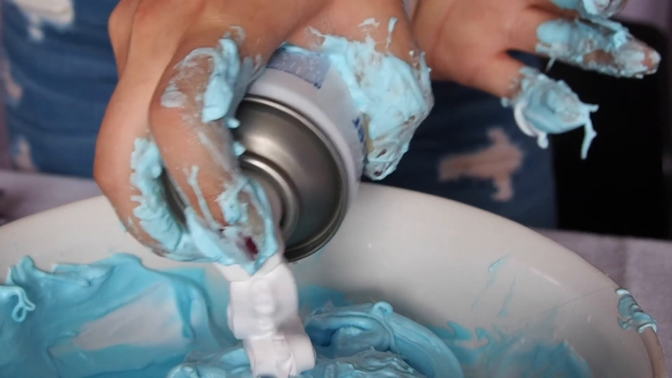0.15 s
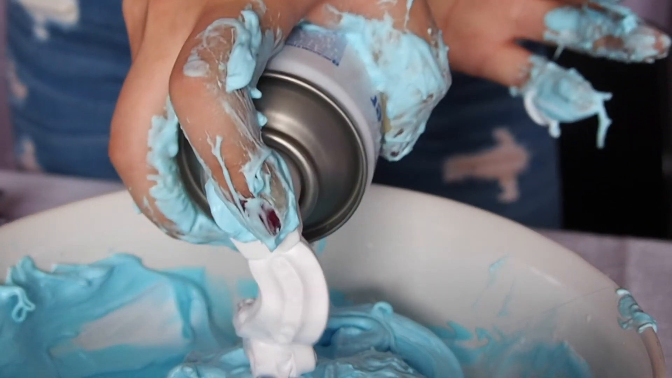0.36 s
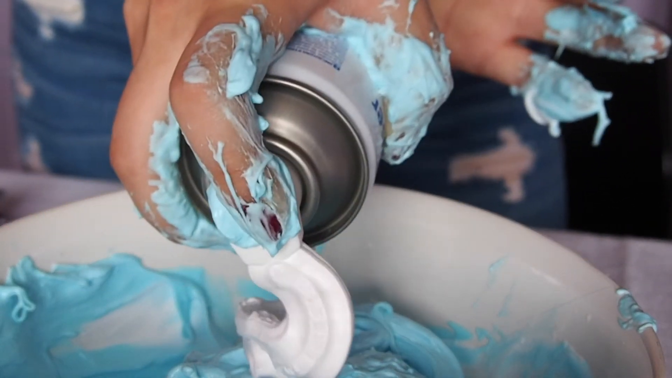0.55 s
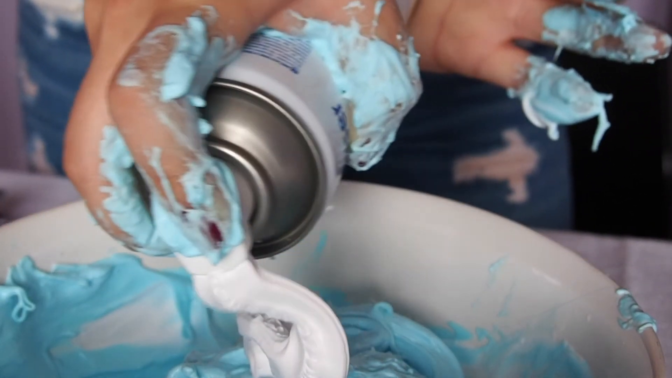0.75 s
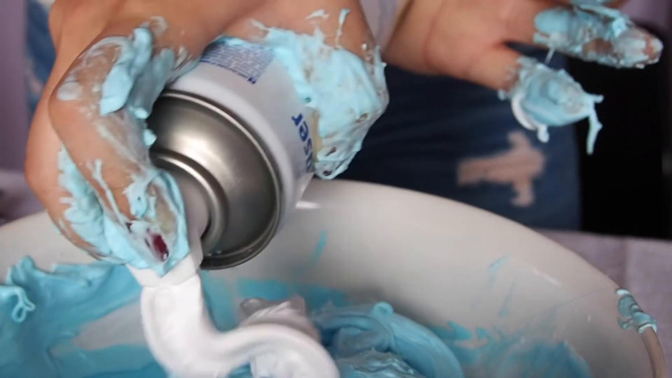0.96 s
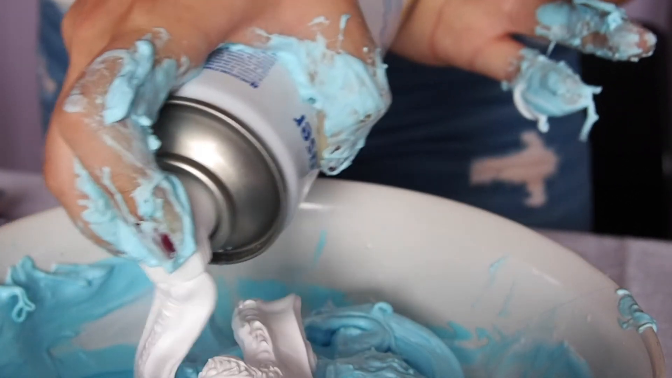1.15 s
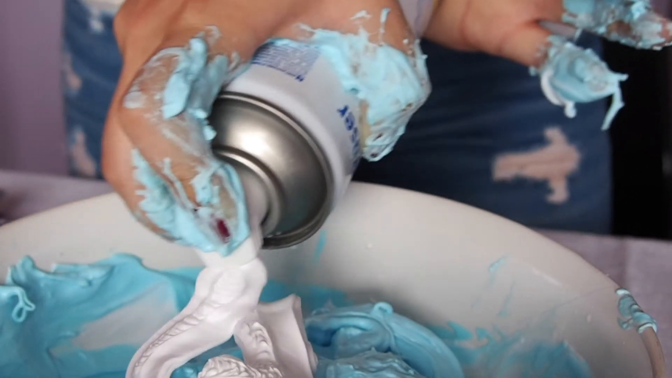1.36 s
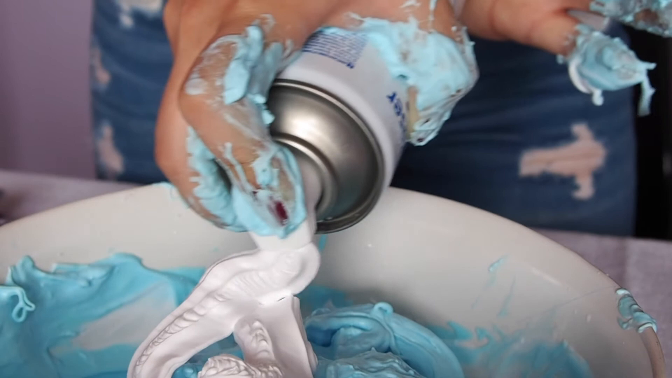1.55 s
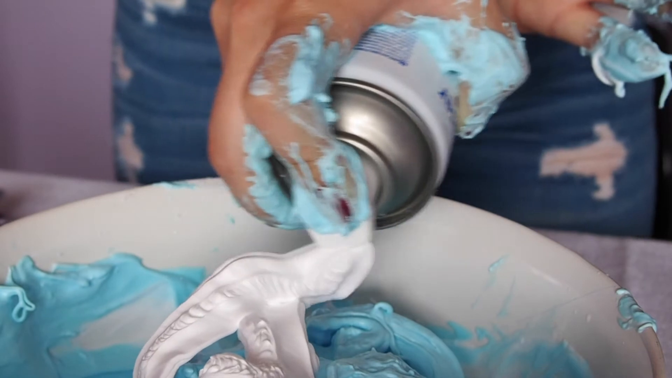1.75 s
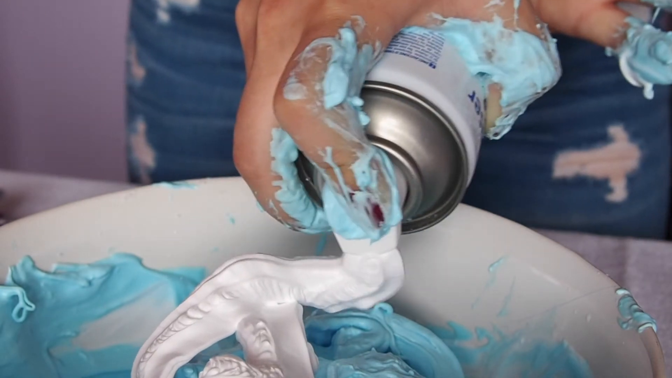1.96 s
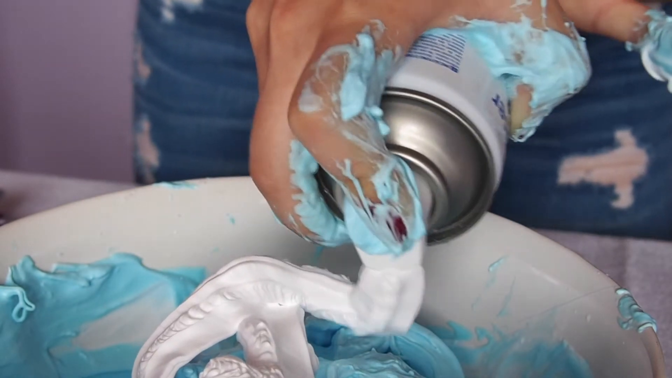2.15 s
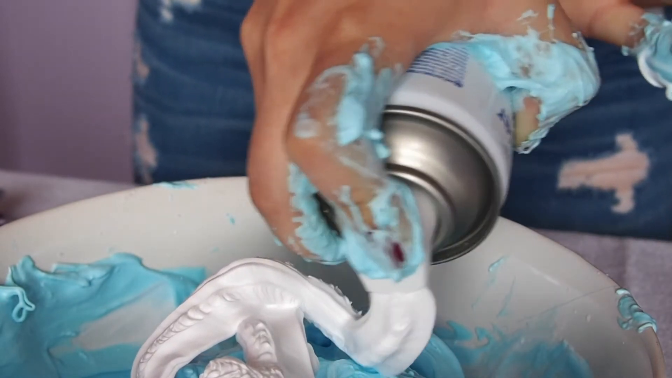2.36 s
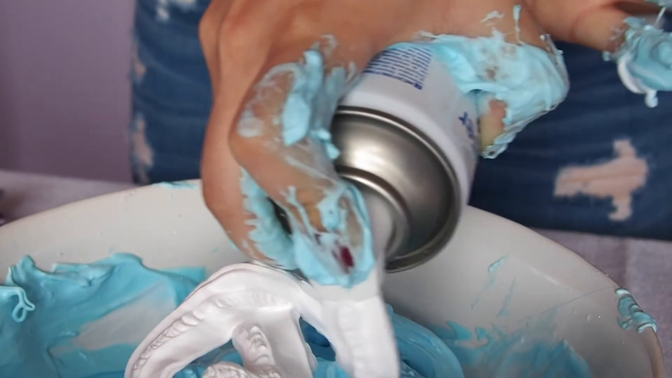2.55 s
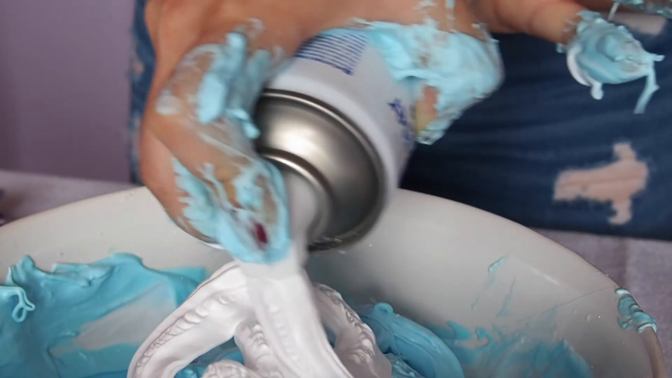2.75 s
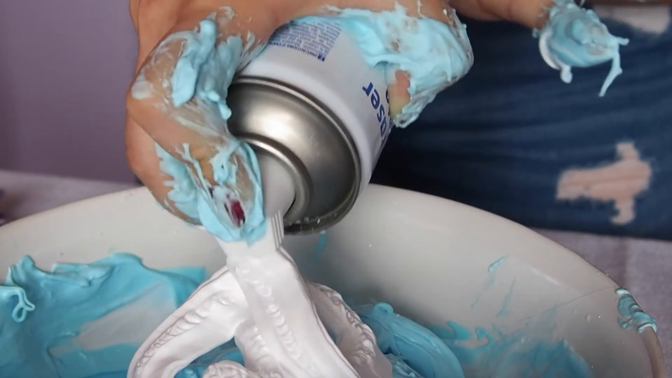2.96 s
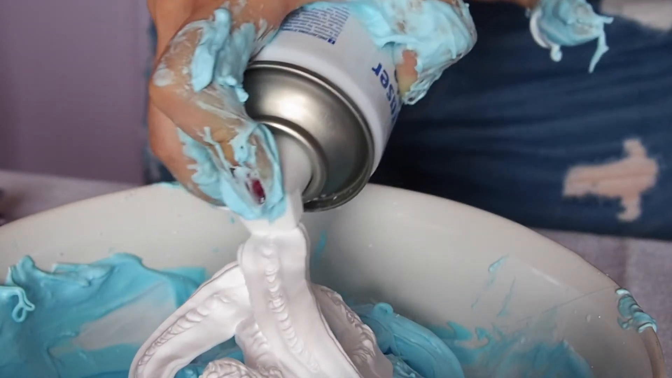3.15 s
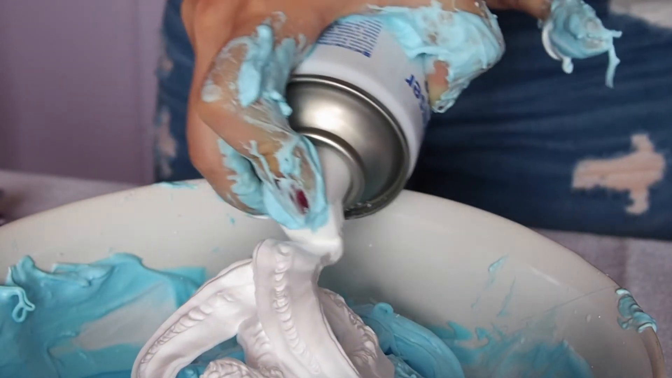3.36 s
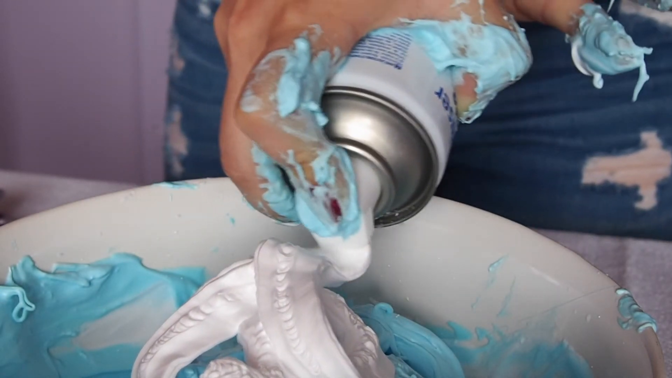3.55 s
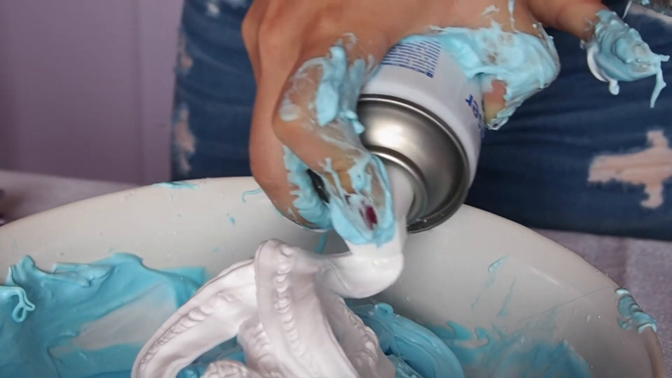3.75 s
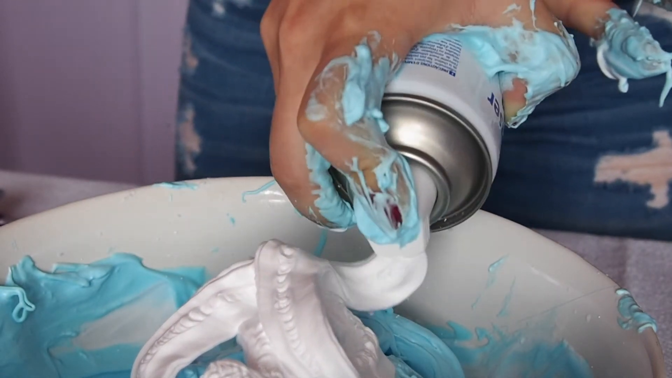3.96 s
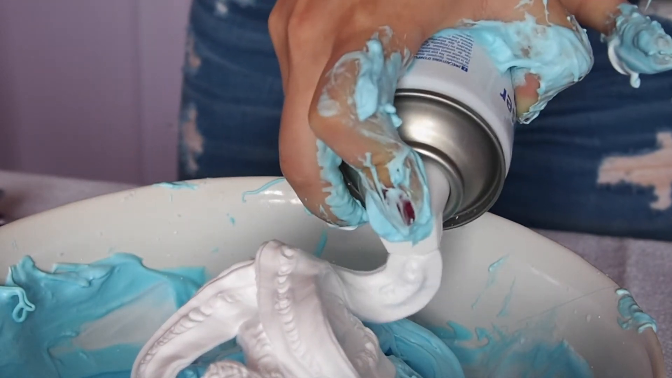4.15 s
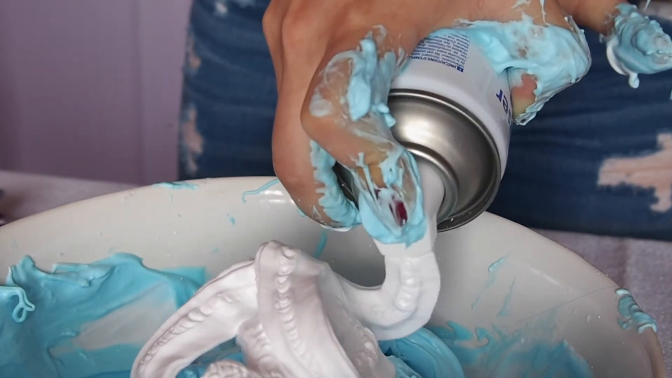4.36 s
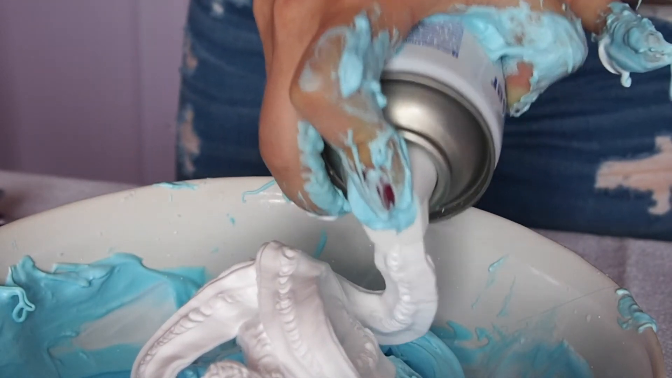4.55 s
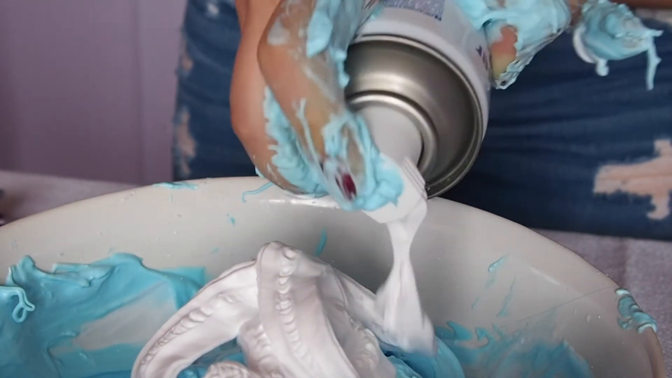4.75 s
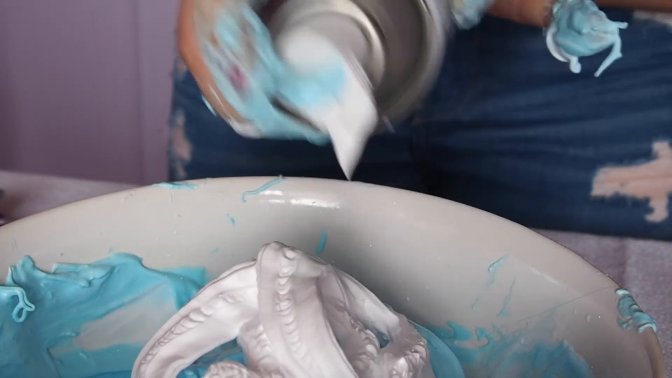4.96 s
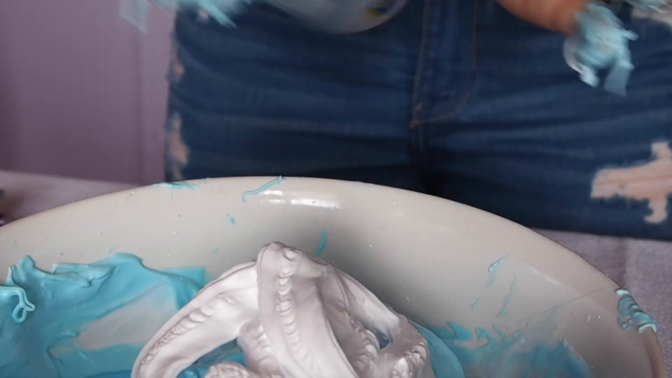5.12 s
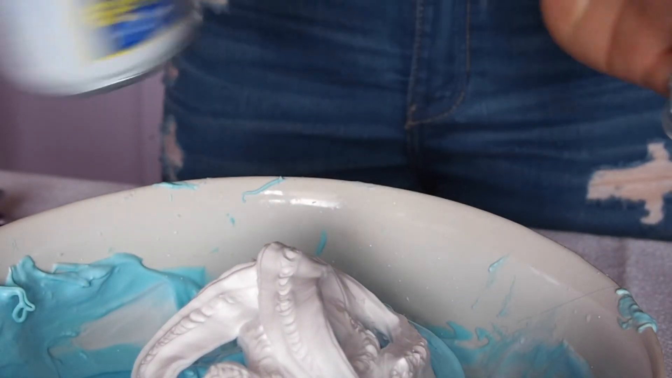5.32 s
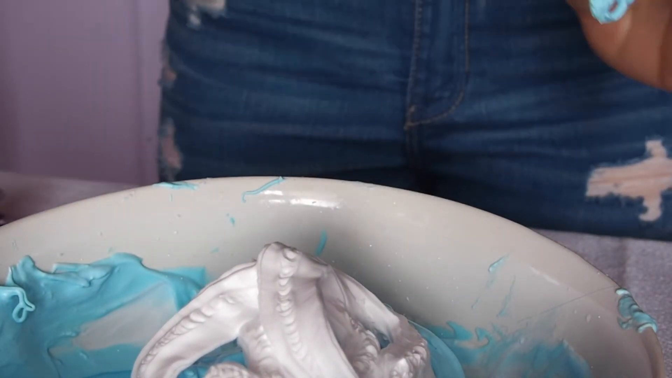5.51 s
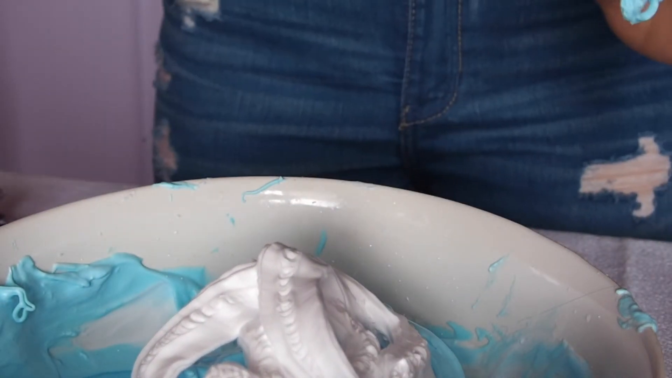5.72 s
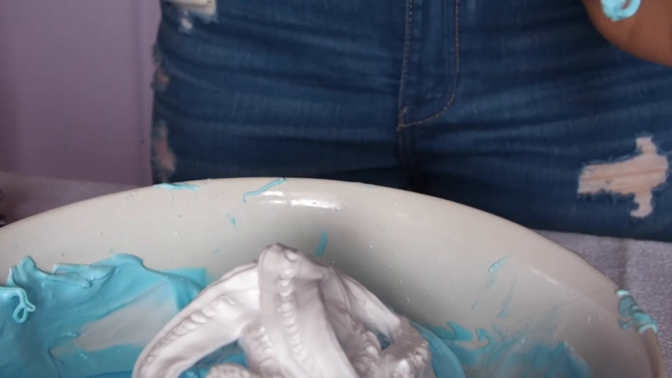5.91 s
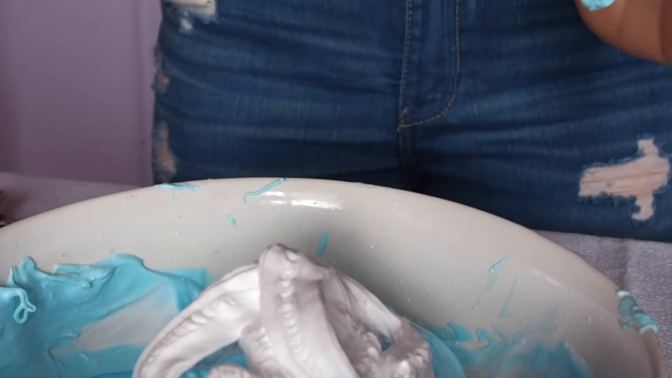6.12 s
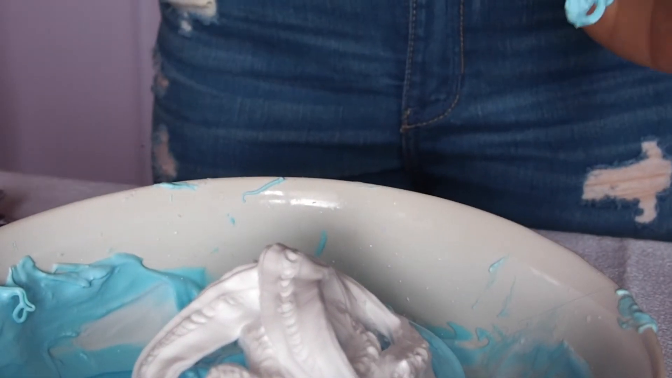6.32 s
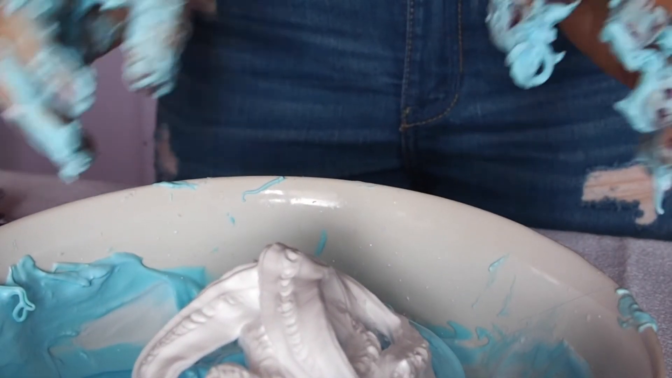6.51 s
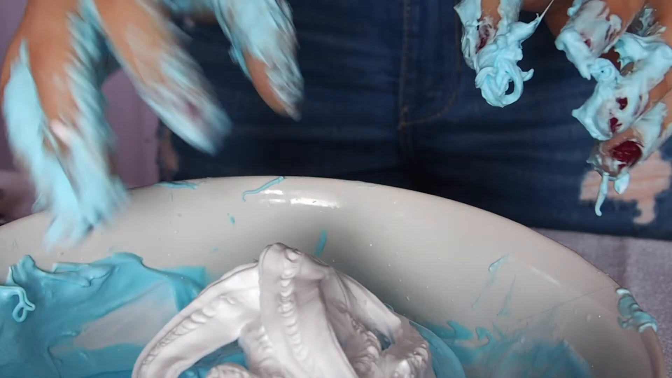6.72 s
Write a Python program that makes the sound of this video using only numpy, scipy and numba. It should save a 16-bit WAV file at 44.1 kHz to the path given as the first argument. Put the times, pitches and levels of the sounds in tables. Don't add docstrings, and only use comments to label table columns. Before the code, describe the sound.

Very close to a stereo microphone in a small quiet room, a pressurised can sprays foam into a bowl. A smooth loud hiss soon turns into fast, uneven sputtering with a shifting hollow ring. The valve shuts suddenly; a few sticky ticks and faint rubbing follow, then the can lands on a table with a low thud and a quick rattle.

```python
import sys
import numpy as np
from scipy import signal
from scipy.fft import rfft, irfft
from scipy.io import wavfile
from scipy.ndimage import uniform_filter1d, map_coordinates
from numba import njit

SR = 44100
rng = np.random.default_rng(int(sys.argv[2]) if len(sys.argv) > 2 else 0)


def gain_from_decibels(decibels):
    exponent = np.asarray(decibels, float) / 20
    return 10 ** exponent


def wav_out(sig):
    wavfile.write(sys.argv[1], SR, np.round(np.clip(np.atleast_2d(sig).T, -1, 1) * 32767).astype(np.int16))


N = 298998
TIME_S = np.arange(N) / SR
VALVE_SHUT_S = 4.697

# pitch_hz, level_db (per Hz)
JET_COLOUR = [(24, -72), (40, -38.5), (230, -12.5), (410, -19), (520, -5.5), (750, -1), (1440, -10.5),
              (1900, -5), (3300, -4.5), (4200, -4.5), (6200, -6), (9500, -7), (12800, -11.5),
              (16000, -16.5)]
# pitch_hz, likeness (-1 to 1)
JET_LIKENESS = [(30, .7), (90, 0.91), (200, 1), (1300, 0.91), (4400, 0.87), (8000, 0.57), (15000, 0.38)]
# start_s, steady_gas_db, pocket_strength_db, pockets_per_s
VALVE_FLOW = [
    (0, -13.5, -32, 43),
    (.6, -12.5, -3.5, 41),
    (1.2, -12, -4, 47),
    (1.7, -14, -1.5, 60.7),
    (2.3, -16, 0, 52.5),
    (2.9, -14.5, 4.5, 52),
    (3.2, -16, 1, 40),
    (3.9, -15.5, 2, 41.5),
    (4.66, -14, 1.5, 55),
]


def spray():
    gas_db, strength_db, per_s = in_time(VALVE_FLOW)
    plain = stereo_noise(JET_COLOUR, JET_LIKENESS)
    jet = hollows(plain)
    swing_ms = np.interp(TIME_S, [0, VALVE_SHUT_S], [-0.014, 0.014]) + 0.0042 * drift(0.83)
    jet = delayed(jet, swing_ms * np.array([[1], [-1]]), order=3)
    bass, body, middle, treble = split(jet, [350, 1100, 6600])
    treble = gain_from_decibels([[-1.0], [0.7]]) * treble
    middle, treble = near_echoes(middle, treble)

    open_valve = np.clip((VALVE_SHUT_S - TIME_S) / 0.011, 0, 1)
    pops = small_pops(per_s=71.0, length_ms=0.71, spread_db=6.0)
    steady = gain_from_decibels(gas_db - 6.5) * np.hypot(gain_from_decibels(0.5), gain_from_decibels(-3.5) * pops)
    flow = np.hypot(steady, spurt_gain(pockets(strength_db, per_s))) * open_valve

    turned = np.clip((TIME_S - 2.6) / 0.4, 0, 1)
    body_db = 0.5 - 0.4 * turned + 1.0 * drift(22)
    treble_db = 2.5 - 2 * turned + 3.5 * drift(150)
    hiss = body * gain_from_decibels(body_db) + middle * gain_from_decibels(1.64 * drift(165)) + treble * gain_from_decibels(treble_db)
    tearing_db = 1.4 * drift(300)
    hiss = filtered(hiss * flow * gain_from_decibels(tearing_db), 2, 250, "high")
    near = hiss * left_right(-0.3) + bass * gain_from_decibels(gas_db + 2.5) * open_valve
    far = gain_from_decibels(2.5) * filtered(plain, 1, 900, "high") * uniform_filter1d(flow, size=600)
    return near, far


def near_echoes(middle, treble):
    for lag_ms, echo_db in [(0.7, 0), (1.3, -3.5), (2.5, -40)]:
        path_ms = lag_ms + 0.094 * np.array([drift(0.66), drift(0.79)])
        middle = middle + gain_from_decibels(echo_db - 10.5) * delayed(middle, path_ms, order=1)
        treble = treble + gain_from_decibels(echo_db - 6) * delayed(treble, path_ms, order=1)
    return middle, treble


# start_s, peak_db
BIG_BURSTS = [(0.027, 6.5), (0.932, 3), (1.358, 0), (1.5634, 7), (1.74, 5), (1.8132, 4.5), (1.8751, 4),
              (1.9607, 6.5), (2.0993, 2.5), (2.209, 7), (2.4264, 8), (2.5107, 6), (2.608, 5), (2.687, 8),
              (2.7834, 3), (2.9079, 0), (3.047, -7), (3.1607, 5), (3.221, 5), (3.424, 3.5), (3.5112, 3.5),
              (3.8284, 5), (3.8851, 5), (3.9825, 3), (4.0452, 6.5), (4.133, -2), (4.337, 3.5), (4.3916, 4),
              (4.5536, 3.5), (4.6179, 5.5)]


def pockets(strength_db, per_s):
    gap, size, length = rng.standard_normal((300, 3)).T
    gap_spread = 0.33
    uneven_gaps = np.exp(gap_spread * gap - gap_spread ** 2 / 2)
    start_s = np.interp(np.cumsum(uneven_gaps), np.cumsum(per_s) / SR, TIME_S)
    burst_s, burst_db = np.transpose(BIG_BURSTS)
    clear_of_bursts = np.abs(start_s[:, None] - burst_s).min(axis=1) > 0.012
    free = clear_of_bursts & (start_s < VALVE_SHUT_S)
    peak_db = strength_db[(start_s * SR).astype(int)] + 1.2 * size

    start_s = np.r_[burst_s, start_s[free]]
    peak_db = np.r_[burst_db + 0.3, peak_db[free]]
    stretch = np.r_[np.full(len(burst_s), 0.85), np.exp(0.19 * length[free])]
    stretch = stretch * np.where(start_s > 3.0, 1.39, 1)
    length_ms = 1000 * 0.22 / per_s[(start_s * SR).astype(int)] * stretch
    return zip(start_s, peak_db, length_ms)


def spurt_gain(rows):
    out = np.zeros(N)
    for start_s, peak_db, length_ms in rows:
        t = np.arange(int(0.05 * SR)) / SR / (max(length_ms, 1) / 1000)
        shape = (1 - np.exp(-t / 0.46)) * np.exp(-t ** 2 * 0.86)
        start = max(int((start_s - 0.001) * SR), 0)
        span = slice(start, start + len(t))
        out[span] = np.hypot(out[span], gain_from_decibels(peak_db - 11.0) * shape)
    return out


def small_pops(per_s, length_ms, spread_db):
    born = (rng.random(N) < per_s / SR) * gain_from_decibels(spread_db * np.minimum(rng.exponential(1, N), 2))
    r = np.exp(-1000 / (length_ms * SR))
    return rms_one(np.sqrt(signal.lfilter([1], [1, -2 * r, r * r], born ** 2 + 1e-12)))


# start_s, pitch_hz, ring_db
NOZZLE_GAP = [(0, 4100, 12), (.45, 3950, 12), (.95, 3790, 7), (1.2, 4000, 9), (1.45, 4600, 6),
              (1.75, 4887, 9), (2.0, 4500, 8), (2.15, 4320, 13.5), (2.35, 4070, 10), (2.6, 3748, 7),
              (2.9, 3806, 13), (3.1, 4500, 9.5), (3.45, 4920, 9), (3.7, 5720, 6.5), (3.85, 6080, 10.5),
              (4.2, 5800, 6.5), (4.66, 6050, 5)]
# from_s, to_s, from_hz, to_hz, lift_db (negative cancels)
NOOKS = [(-.2, 0.79, 2320, 2110, 7), (-.2, 1.072, 5100, 4170, -22), (.7, 1.05, 8600, 8800, 4),
         (0.793, 1.315, 2630, 2880, 4), (1.007, 1.302, 7050, 7830, 12.5), (1.193, 2.01, 2420, 1960, 7),
         (1.398, 1.8, 8600, 8300, 2.5), (1.76, 2.14, 9500, 8800, 9), (1.897, 2.81, 2900, 2980, 8),
         (2.29, 2.574, 9100, 8600, 9.5), (2.5, 3.15, 1150, 1210, -18), (2.498, 3.456, 2040, 1930, 7.5),
         (3.048, 4.637, 1620, 1550, -34), (3.1, 3.81, 2820, 2840, 5.5), (3.085, 3.743, 8300, 9800, 2.5),
         (3.212, 4.643, 1210, 1320, 6.5), (3.6, 4.668, 3850, 3556, 8), (4.482, 4.904, 4188, 4394, 11),
         (-.2, 1.192, 1200, 1060, -8)]


def hollows(jet):
    gap_hz, ring_db = in_time(NOZZLE_GAP)
    jet = lift(jet, gap_hz, 590, ring_db)
    jet = lift(jet, 0.869 * gap_hz, 390, -7)
    for from_s, to_s, from_hz, to_hz, lift_db in NOOKS:
        span = np.arange(max(int(from_s * SR), 0), int(to_s * SR))
        t = span / SR
        opened = np.clip(np.minimum(t - from_s, to_s - t) / 0.13, 0, 1)
        hz = np.interp(t, [from_s, to_s], [from_hz, to_hz])
        width_hz = 220 + 0.0083 * from_hz
        jet[:, span] = lift(jet[:, span], hz, width_hz, lift_db * opened)
    return jet


# start_s, blow_db, rim_db
BLOWS = [
    (5.7909, 2.5, -29),
    (5.8262, -7.5, -20),
    (5.845, -6.5, -21.5),
    (5.862, -6.5, -28),
    (5.878, -15, -16),
    (5.915, -10.5, -20.5),
    (5.950, -25, -18.5),
    (5.99, -12, -29),
    (6.044, -32, -38),
]
# pitch_hz, level_db, fade_s (by 60 dB)
TABLE_BOOM = [(89, -37, 0.93), (167.4, -7.5, 0.67), (215, -8, 0.4), (200, -2.5, 0.091)]
# pitch_hz, level_db, fade_s (by 60 dB)
TABLE_TOP = [(147, -34, 0.18), (230.4, -12, 0.16), (259, -6, 0.098), (380, -26, 1), (454, -13, 0.15),
             (529, -0.5, 0.14), (637, 3.5, 0.18)]
# pitch_hz, level_db, fade_s (by 60 dB)
CAN_BODY = [(591, 1, 0.18), (692, -1, 0.066), (900, 3.5, 0.17), (1016, -11, 0.12), (1350, -15, 0.094),
            (1767, -6.5, 0.056), (1980, -22, 0.14)]
# pitch_hz, level_db, fade_s (by 60 dB)
BASE_EDGE = [(2820, -36.5, 0.0035), (3850, -38.5, .002), (4860, -38, 0.0043), (6900, -46, 0.0035),
             (8900, -55, .003)]


def set_down():
    start_s, blow_db, rim_db = np.transpose(BLOWS)
    blows, rim, edge, heel = np.zeros((4, N))
    blows[(start_s * SR).astype(int)] = gain_from_decibels(blow_db)
    rim[(start_s * SR).astype(int)] = gain_from_decibels(rim_db)
    edge[int(5.8015 * SR):][:130] = rng.standard_normal(130)

    push = filtered(blows, 4, 330)
    first_push = push * (TIME_S < start_s[1])
    table = ring_all(first_push, TABLE_BOOM) + ring_all(push, TABLE_TOP)

    chatter = 0.075 * signal.lfilter([1], [1, -gain_from_decibels(-60 / (0.082 * SR))], rim) * rng.standard_normal(N)
    knock = gain_from_decibels(9) * filtered(chatter, 2, [350, 1700], "band")
    struck = filtered(0.55 * rim + 0.15 * chatter, 4, 2100)
    heel[((5.829 + 0.036 * np.arange(4)) * SR).astype(int)] = gain_from_decibels(-24)
    heel = signal.lfilter([0.1], [1, -gain_from_decibels(-60 / (0.066 * SR))], heel) * rng.standard_normal(N)
    low_modes = [mode for mode in CAN_BODY if mode[0] < 1500]
    high_modes = [mode for mode in CAN_BODY if mode[0] >= 1500]
    can = knock + ring_all(struck, low_modes) + ring_all(heel, high_modes) + ring_all(edge, BASE_EDGE)

    damped = gain_from_decibels(-150 * np.maximum(TIME_S - 5.965, 0))
    return filtered((table + can) * damped, 4, 72, "high")


# start_s, peak_db, pitch_hz, left_right_db, bright_snap_db
TICKS = [(4.837, -25, 5200, -8, 9), (5.118, -15, 6000, 1.0, -1.5), (5.258, -24, 5800, -3, -9),
         (5.344, -1.5, 5070, 5, -4.5), (5.5197, -23.5, 4770, -4, -2), (5.8981, -35, 11700, 5, 2),
         (6.0085, -20, 7920, 4, -15), (6.1471, -29, 12200, -8, -6), (6.176, -32, 12600, 6.5, -13),
         (6.187, -26, 8000, 4, 7), (6.2064, -35, 12600, -6, -10), (6.5506, -23, 4700, -1.0, -11)]


def ticks():
    out = np.zeros((2, N))
    t = np.arange(int(0.022 * SR)) / SR
    for start_s, peak_db, hz, pan_db, snap_db in TICKS:
        crumble = 0.11 * rng.standard_normal(len(t)) * np.exp(-t / 0.0017)
        kick = (t == 0) + crumble
        snap = filtered(kick, 2, min(0.5 * hz, 9000), "high")
        tick = ring(kick, hz, 3 / hz) + gain_from_decibels(snap_db + 7) * snap
        start = int((start_s + 0.0025) * SR)
        out[:, start:start + len(t)] += gain_from_decibels(peak_db) * tick * left_right(pan_db / 2)
    return filtered(out, 2, 1100, "high")


# start_s, length_s, level_db
BRUSHES = [
    (5.19, .12, -49.5),
    (5.32, 0.13, -46),
    (5.87, 0.3, -45),
    (6.12, 0.2, -48.5),
]


def rustle():
    fidget_from_s = 4.8
    level = gain_from_decibels(-59 - 3.5 * (TIME_S - fidget_from_s)) * (TIME_S > fidget_from_s)
    for start_s, length_s, db in BRUSHES:
        peak_s = start_s + 0.027
        swell = np.interp(TIME_S, [start_s, peak_s, peak_s + length_s], [0, 1, 0])
        level = np.hypot(level, gain_from_decibels(db) * swell)
    colour = [(2000, -8.0), (7000, -3.5), (12000, -1), (16000, -4)]
    noise = stereo_noise(colour, [(1000, 0.3), (16000, 0.1)])
    return level * gain_from_decibels(3.5 + 3.5 * drift(150)) * noise


# pitch_hz, fade_s (by 60 dB)
ROOM_FADE = [(100, 0.57), (2000, 0.59), (8000, 0.18), (16000, 0.51)]


def room(x):
    t = np.arange(SR) / SR - 0.006
    tail = np.zeros((2, SR))
    edges = 60 * 2 ** np.arange(9)
    for low, high in zip(edges, edges[1:]):
        fade_s = at_pitch(ROOM_FADE, low * np.sqrt(2))
        band = filtered(rng.standard_normal((2, SR)), 2, [low, high], "band")
        tail += band * gain_from_decibels(-60 * t / fade_s) * (t > 0)
    tail = 0.22 * tail + 1.14 * tail.mean(axis=0)
    return signal.fftconvolve(x, tail / np.sqrt(np.sum(tail ** 2) / 2), axes=1)[:, :N]


# pitch_hz, level_db
AIR_COLOUR = [(12, -33), (20, 1), (27, -26), (96, -7.5), (130, -10.5), (204, -1), (293, -18), (499, -12.5),
              (759, -17.5), (1000, -12), (1610, -23), (3840, -26.5), (6540, -28), (14700, -40),
              (16000, -53)]
# pitch_hz, likeness (-1 to 1)
AIR_LIKENESS = [(60, 0.44), (180, 0.85), (550, 0.72), (1650, 0.27), (4970, -0.22), (15000, -0.41)]


def room_air():
    return gain_from_decibels(-40.5 + 1.0 * drift(3.0)) * stereo_noise(AIR_COLOUR, AIR_LIKENESS)


def rms_one(x):
    return x / np.sqrt(np.mean(x ** 2) + 1e-20)


def left_right(db):
    return gain_from_decibels([[db], [-db]])


def in_time(rows):
    start_s, *columns = np.transpose(rows)
    return [np.interp(TIME_S, start_s, column) for column in columns]


def at_pitch(points, hz):
    known_hz, value = np.transpose(points)
    return np.interp(np.log(hz), np.log(known_hz), value)


def filtered(x, order, hz, kind="low"):
    return signal.sosfilt(signal.butter(order, hz, kind, fs=SR, output="sos"), x)


def split(x, edges_hz):
    lows = [signal.sosfiltfilt(signal.butter(2, hz, fs=SR, output="sos"), x) for hz in edges_hz]
    return [high - low for low, high in zip([0] + lows, lows + [x])]


def delayed(x, lag_ms, order):
    read = np.arange(N) - lag_ms * SR / 1000
    side = np.repeat([[0], [1]], N, axis=1)
    return map_coordinates(x, [side, read], order=order)


def stereo_noise(colour, likeness):
    hz = np.maximum(np.arange(N // 2 + 1) * SR / N, 1)
    mid, side = rfft(rng.standard_normal((2, N)))
    alike = np.clip(at_pitch(likeness, hz), -1, 1)
    pair = np.sqrt(1 + alike) * mid + np.sqrt(1 - alike) * side * [[1], [-1]]
    return rms_one(irfft(pair * gain_from_decibels(at_pitch(colour, hz)), N))


def drift(rate_hz):
    r = np.exp(-2 * np.pi * rate_hz / SR)
    smooth = signal.lfilter([1], [1, -2 * r, r * r], rng.standard_normal(N + SR))
    return rms_one(smooth[SR:])


def ring(clicks, hz, fade_s):
    r = gain_from_decibels(-60 / (fade_s * SR))
    w = 2 * np.pi * hz / SR
    return signal.lfilter([0, np.sin(w)], [1, -2 * r * np.cos(w), r * r], clicks + 1e-18)


def ring_all(clicks, modes):
    return sum(gain_from_decibels(db) * ring(clicks, hz, fade_s) for hz, db, fade_s in modes)


@njit
def moving_band(x, two_r_cos, r):
    y = np.zeros_like(x)
    for i in range(2, x.shape[1]):
        push = (1 - r * r) / 2 * (x[:, i] - x[:, i - 2])
        y[:, i] = push + two_r_cos[i] * y[:, i - 1] - r * r * y[:, i - 2]
    return y


def lift(x, hz, width_hz, lift_db):
    r = np.exp(-np.pi * width_hz / SR)
    band = moving_band(np.ascontiguousarray(x), 2 * r * np.cos(2 * np.pi * hz / SR), r)
    return x + (gain_from_decibels(lift_db) - 1) * band


def scene():
    jet, far_jet = spray()
    thud = set_down()
    snaps = ticks()
    echo = gain_from_decibels(-10) * room(far_jet + gain_from_decibels(-1) * snaps + gain_from_decibels(-2) * thud)
    return jet + thud + snaps + echo + rustle() + room_air()


def band_limit(x):
    return signal.sosfilt(signal.butter(12, 16150, fs=SR, output="sos"), x)


# pitch_hz, width_hz, dip_db
MIC_DIPS = [(6680, 850, -9), (10490, 1620, -16)]


def record(dry):
    low, top = split(dry, [11600])
    x = low + top * left_right(1.3)
    for hz, width_hz, dip_db in MIC_DIPS:
        x = x + (gain_from_decibels(dip_db) - 1) * signal.lfilter(*signal.iirpeak(hz, hz / width_hz, fs=SR), x)
    x = x / (1 + np.abs(x) ** 12) ** (1 / 12)
    x = signal.sosfilt(signal.cheby2(12, 60, 16450, fs=SR, output="sos"), x)
    mix = filtered(x, 2, 45, "high") - 0.005
    return band_limit(mix)


dry = scene()
out = record(dry)
wav_out(out)
```